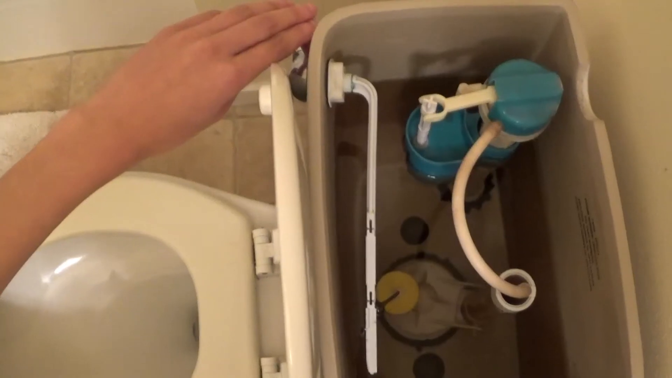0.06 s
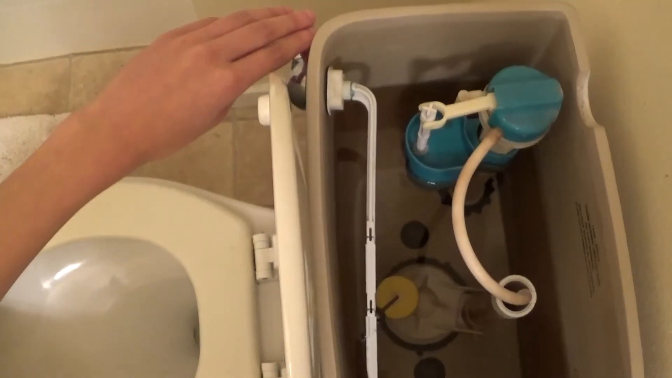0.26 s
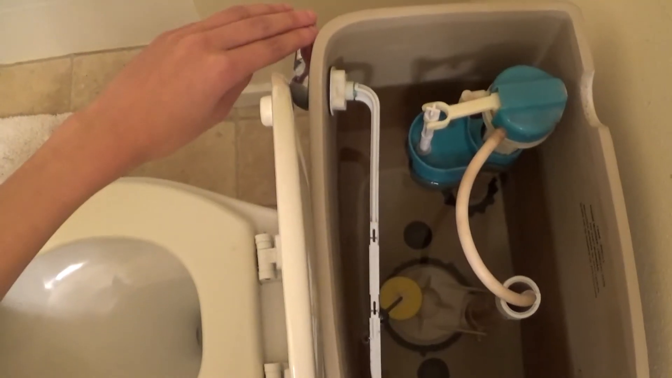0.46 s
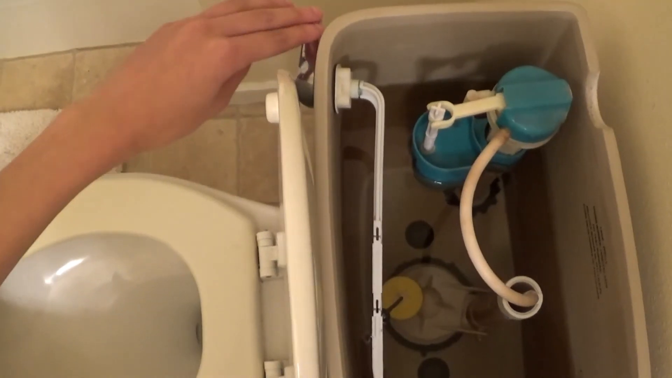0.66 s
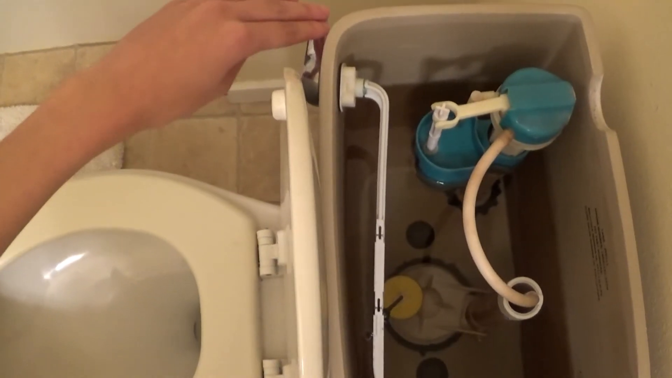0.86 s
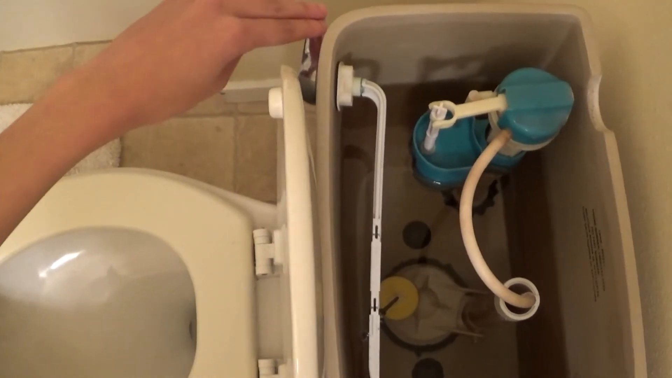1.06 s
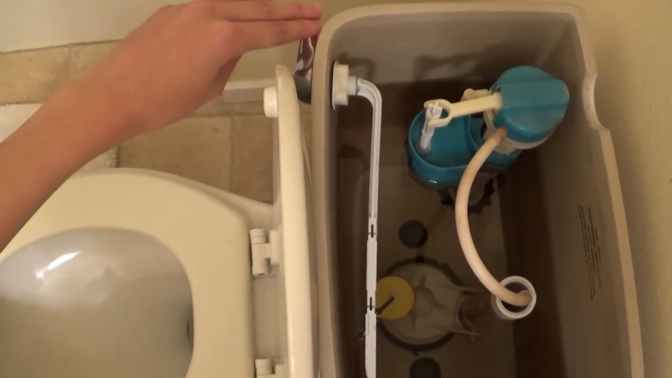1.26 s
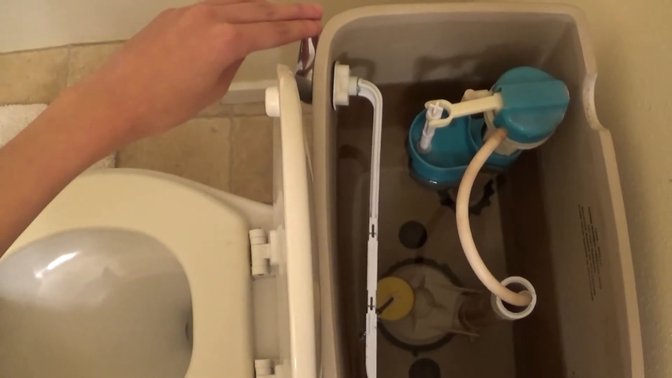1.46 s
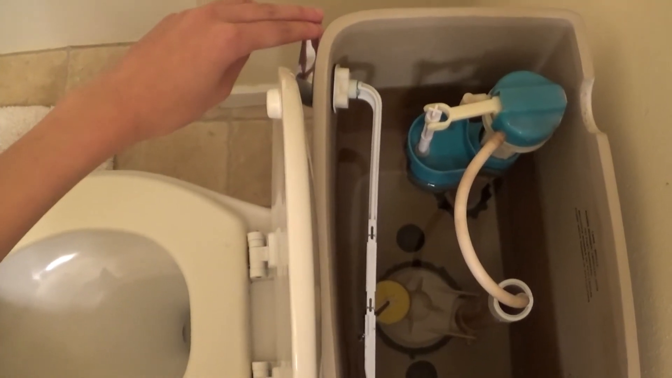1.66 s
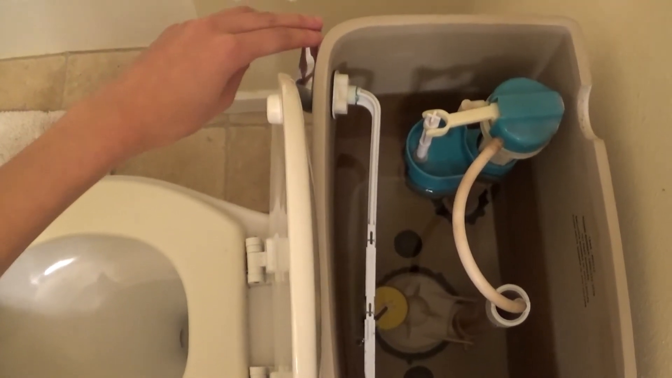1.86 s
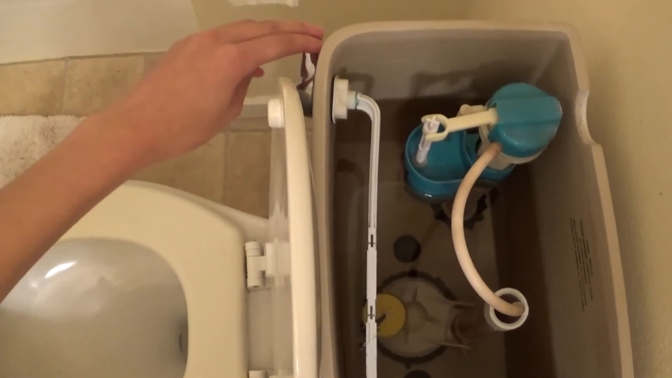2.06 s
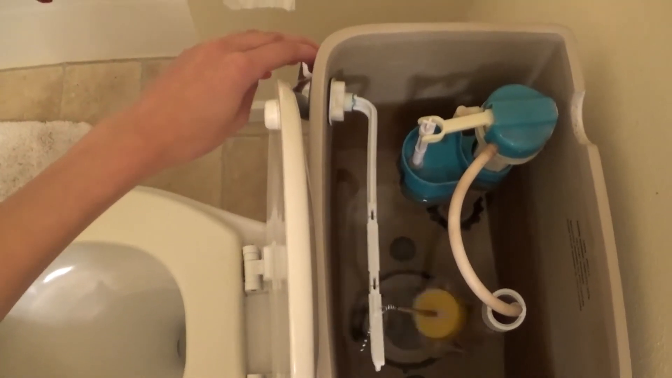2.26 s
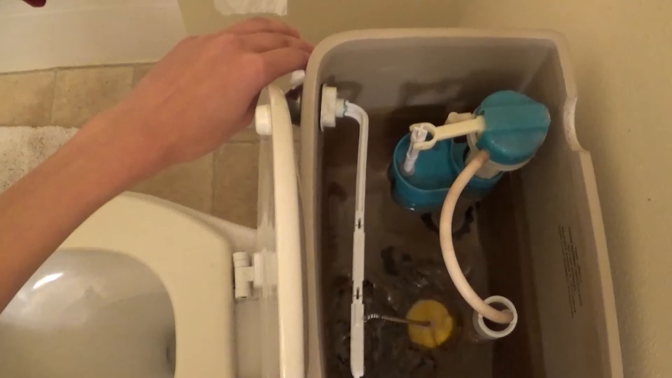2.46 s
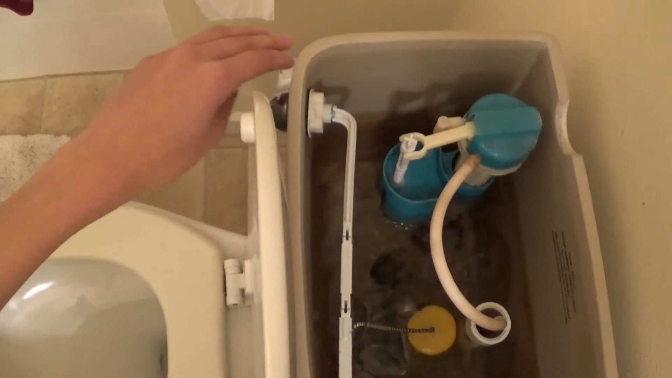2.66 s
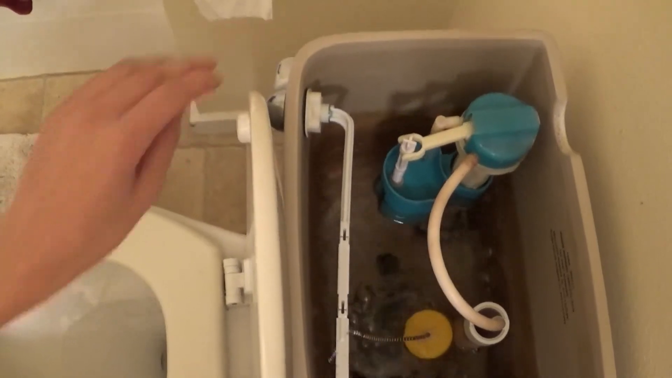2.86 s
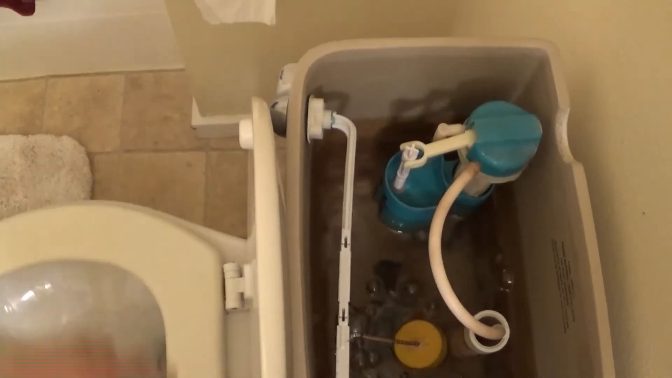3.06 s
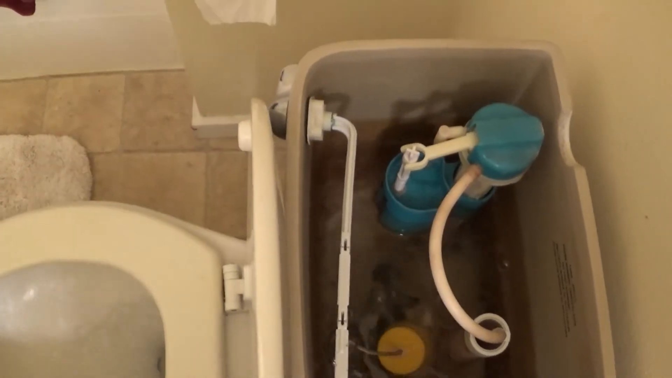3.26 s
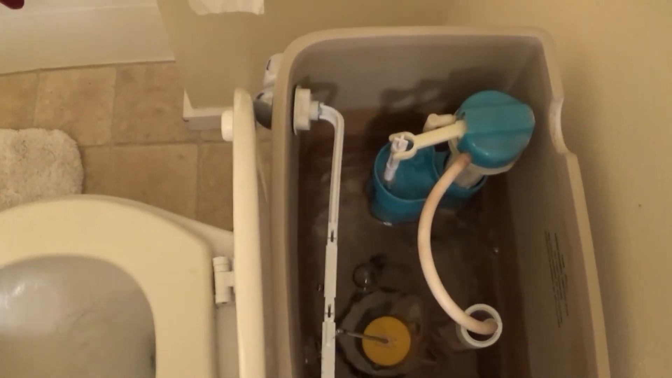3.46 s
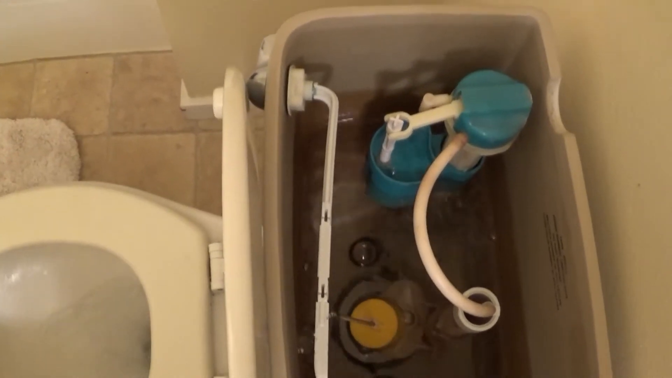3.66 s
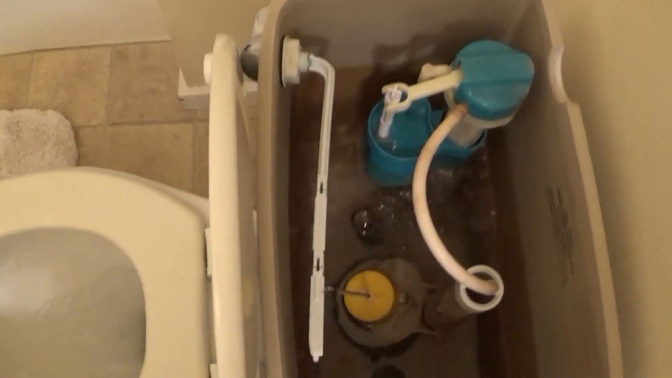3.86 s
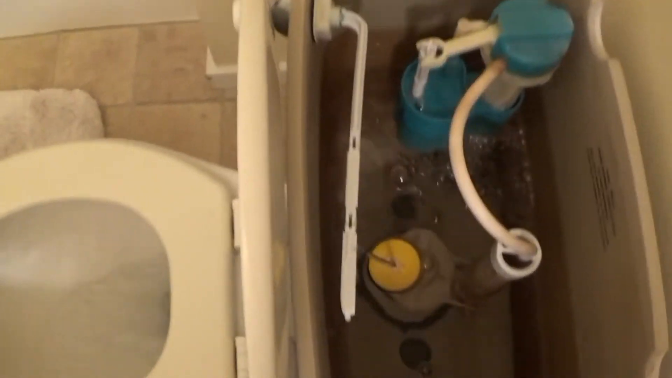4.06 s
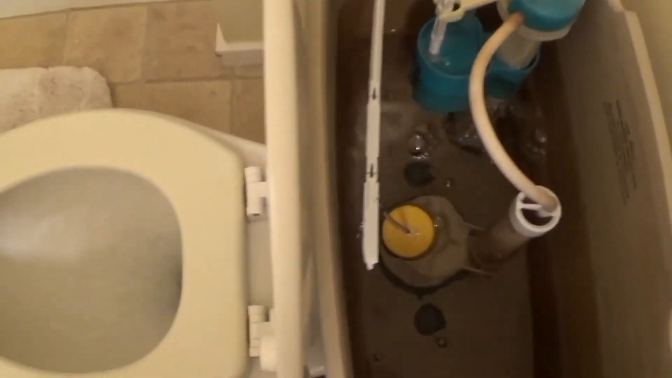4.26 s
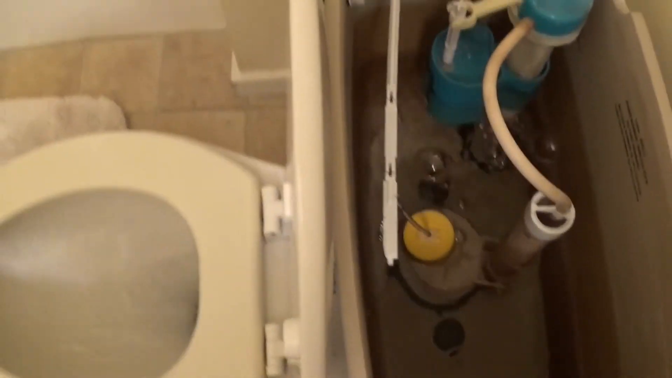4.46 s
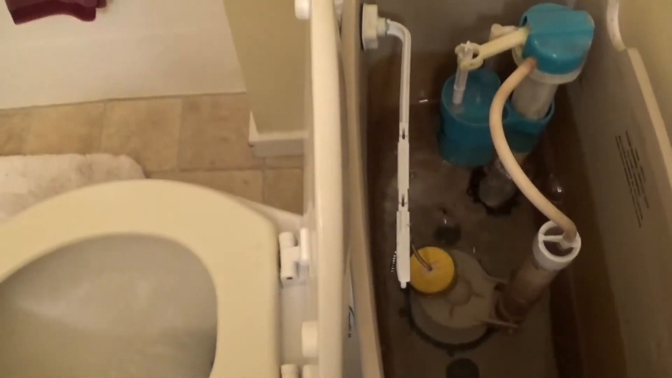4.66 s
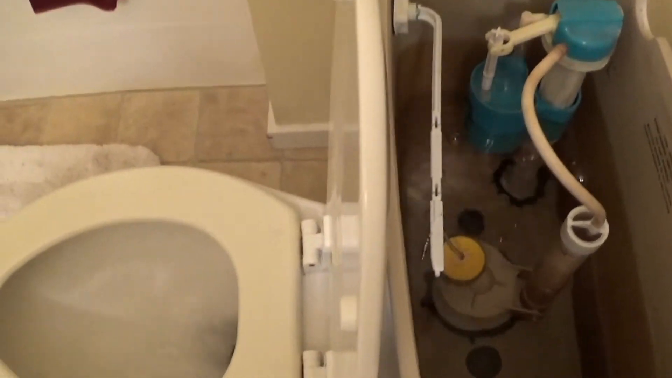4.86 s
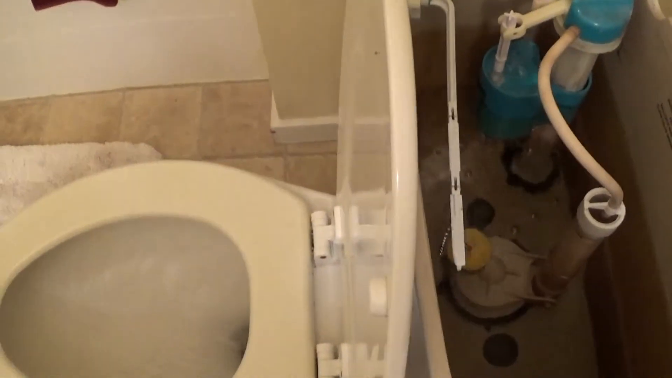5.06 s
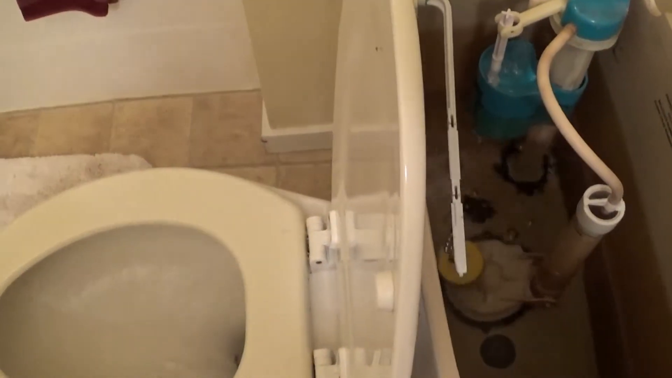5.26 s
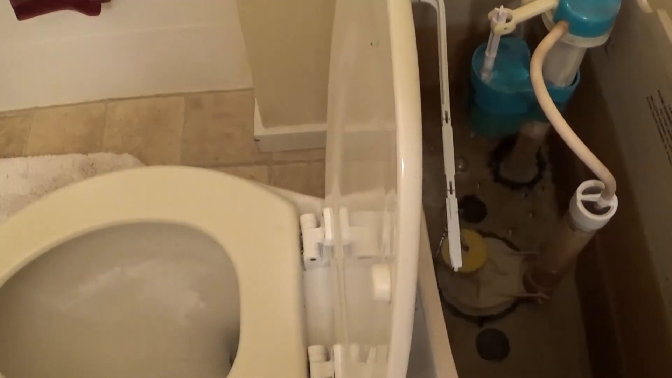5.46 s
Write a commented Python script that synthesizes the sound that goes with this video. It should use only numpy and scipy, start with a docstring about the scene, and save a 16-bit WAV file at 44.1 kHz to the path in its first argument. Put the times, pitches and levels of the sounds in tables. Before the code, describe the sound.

A metallic lever clatter breaks a hushed bathroom, then a toilet flush rushes with squealing, hissing valve, bubbling tank water and a late hollow gulp.

```python
"""A faint flow hums in the pipe of a small bathroom, heard from just above an open toilet tank. The handle
clacks in short, rough rings, the flapper lifts, and the fill valve squeals and hisses. Swarms of decaying
bubbles gurgle, splash and spit in the ringing porcelain tank, with plops on top. Noise through hollow,
wandering resonances becomes the drumming refill stream; near the end the bowl's siphon joins it with dull
thumps and a hollow gulping."""
import sys
import numpy as np
from scipy import signal
from scipy.fft import rfft, irfft, next_fast_len
from scipy.io import wavfile
from scipy.ndimage import uniform_filter1d, map_coordinates

SR = 44100
rng = np.random.default_rng(int(sys.argv[2]) if len(sys.argv) > 2 else 0)


def store_wav(level_fs):
    """Save 16-bit WAV to argv[1]."""
    pcm = np.round(np.clip(np.atleast_2d(level_fs), -1, 1) * 32767)
    wavfile.write(sys.argv[1], SR, pcm.T.astype(np.int16))


N = 243431
T = np.arange(N) / SR  # time in seconds

# resonances of the pipe's air column: pitch_hz, width_hz, level_db
PIPE_MODES = [(349.9, 6.3, -3.5), (395.8, 7.5, -11.5), (468.4, 11, -15.5), (711, 25, -12), (1217, 23, -8.5)]
# level of the faint flow, its last value held to the end: time_s, level_db
TRICKLE_LEVEL = [(0.3, -43), (0.42, -45), (1.8, -42.5), (2.0, -44.5)]
# tone of the still room: freq_hz, level_db
ROOM_TONE = [(60, -33), (110, -8.5), (300, -1), (950, -10.5), (3500, -18), (16000, -25)]
# decay of the porcelain and walls: freq_hz, t60_s
WALL_DECAY = [(200, 0.54), (1500, 0.21), (12000, 0.051)]
# tone of the stereo side signal, narrow in the bass and top treble: freq_hz, side_db
SIDE_TONE = [(200, -40), (600, -13.5), (2500, -4.5), (9000, -6), (13000, -29)]

# handle and lift arm contacts, relative levels: start_s, dull_knock_db, clink_db, bright_tick_db
HANDLE_CONTACTS = [(2.099, -34.5, -25.5, -24), (2.115, -45, -20, -27), (2.129, -38, -20, -32),
                   (2.161, -17, -47, -55), (2.171, -14, -26, -11.5), (2.194, -36, -19.5, -16),
                   (2.223, -22, -24, -6.5), (2.233, -25, -7, -26)]
# modes the contacts ring: pitch_hz, level_db, t60_s
LEVER_MODES = [(1120, -1.5, 0.12), (1197, 1, 0.12), (1610, -4.5, 0.053), (1970, -16, 0.19),
               (2610, -17, 0.064), (3260, -2, 0.046), (3790, -1, 0.039), (4480, -4, 0.076),
               (5210, -3.5, 0.061), (6020, -10, 0.093), (7300, -8.5, 0.03), (9030, -3, 0.081)]
CONTACT_S, FIRM_DB = 0.001, -12.5  # rise time of a firm contact; lighter ones slide in more slowly
# friction at each contact: relative level, decay time, sharpness of its resonances
SCRAPE_DB, SCRAPE_S, SCRAPE_Q = 6, 0.019, 11.6

# strength of the running water, used relative to its mean: time_s, level_db
FLOW_LEVEL = [(2.28, -28.5), (2.34, -32), (2.54, -27.5), (2.66, -19.5), (3.08, -27.5), (3.36, -22.5),
              (4.23, -28.5), (4.45, -25), (4.95, -25.5), (5.24, -20.5), (5.5, -22.5)]
FLAPPER_S, OPEN_S = 2.16, 0.059  # when the flapper starts to lift, and how long it takes
GURGLE_DB, SPLASH_DB, SPRAY_DB = -31.5, -23, -25.5  # base levels at average flow
BUBBLES_FOLLOW = 0.46  # dB per dB of flow; the spray follows it fully
DRAIN_FROM_S, DRAIN_S = 2.608, 0.31  # the water level drops and lays the inlet stream bare
COARSE_COVERED_DB, FINE_COVERED_DB = -4, -10  # change in splashing while the tank is still full
CHURN_DB, CHURN_PER_S = 0.8, 14  # each size of bubble comes and goes by chance: depth, knots a second
# the outlet gulps air and the whole tank surges: middle_s, length_s, rise_db
TANK_GLUGS = [(2.318, 0.23, 11), (2.467, 0.36, 4), (3.143, 0.47, 8), (3.273, 0.26, 5.5), (3.853, 0.16, 8),
              (4.013, 0.24, 6.5), (4.428, 0.047, 6), (4.726, 0.16, 7)]
GLUG_SHARE = 0.46  # share of that rise in the smaller bubbles
# the stream slaps the surface and small bubbles swell: middle_s, length_s, rise_db, bubble_pitch_hz
STREAM_SLAPS = [(2.502, 0.2, 6, 7500), (2.623, 0.078, 14, 4360), (2.847, 0.09, 7.5, 3230),
                (3.028, 0.2, 5.5, 2900), (3.275, 0.15, 4.5, 3000), (3.767, 0.16, 9, 3000),
                (4.029, 0.12, 5.5, 6460), (4.375, 0.22, 4.5, 2640), (4.702, 0.091, 7, 4330),
                (5.215, 0.084, 2.5, 8550), (5.333, 0.04, 8, 4060)]
SLAP_OCTAVES = 0.89  # spread of bubble pitch around each slap
# tone of the big bubbles: freq_hz, level_db
GURGLE_TONE = [(30, -49), (130, -12), (290, -3), (480, -0.5), (650, 1.5), (850, -2), (1300, 11)]
# tone of the smaller bubbles: freq_hz, level_db
SPLASH_TONE = [(450, -36), (800, -5.5), (1750, -0.5), (3100, -3), (5200, -11.5), (9000, -16)]
# tone of the fine spray: freq_hz, level_db
SPRAY_TONE = [(2000, -35), (3600, -7), (5800, -6), (9000, -0.5), (10200, -2.5), (11800, -11.5),
              (16000, -28)]
# resonances of the air in the tank: pitch_hz, width_hz, level_db
TANK_MODES = [(326, 63, 4), (665, 170, -6), (1048, 53, 3), (1388, 210, -0.5), (1730, 23, 1.5)]

# squeals as the float drops: start_s, length_s, level_db, starting_pitch_hz
VALVE_SQUEALS = [(2.225, 0.11, -22, 3350), (2.505, 0.12, -25.5, 3790)]
SQUEAL_SAG_HZ_PER_S, SQUEAL_ROUGH_HZ = 3000, 87.8
# resonances of the fill valve's whistling hiss: pitch_hz, width_hz, level_db
VALVE_MODES = [(3210, 49, 4), (3810, 860, 0.5), (11600, 4500, -7.5)]

# large bubbles: start_s, level_db, pitch_hz, t60_s, pitch_climb (share over that time; below 0 it falls)
LARGE_BUBBLES = [(2.29, -21, 383.6, 0.43, 0.5), (2.32, -19, 816, 0.23, -0.091),
                 (2.355, -15, 372, 0.15, -0.46), (2.426, -5, 4010, 0.017, -0.14),
                 (2.43, -17.5, 473, 0.19, 0.27), (2.462, 0.5, 2145, 0.016, -0.042),
                 (2.471, -15.5, 964, 0.11, 0.4), (2.497, -15.5, 1110, 0.18, 0.38),
                 (2.502, -11.5, 530, 0.097, 0.59), (2.724, -20, 1160, 0.42, 0.0027),
                 (2.922, -16, 543, 0.17, 0.094), (3.235, -16, 640, 0.5, 0.18), (5.427, -9, 920, 0.04, 0.05)]
WAVER, WAVER_PER_S = 0.014, 90  # typical share by which a bubble's pitch wavers, knots a second
SHED_COUNT, SHED_DB = 3, -10  # each sheds short-lived bubbles up to an octave higher, relative level
# drops bursting close by: start_s, peak_db (before placing), pitch_hz
BURSTING_DROPS = [(2.295, -8, 9800), (2.613, -8, 4260), (2.625, -3.5, 4440), (2.705, -12, 7800),
                  (2.798, -11, 8590), (2.89, -4.5, 7800), (2.921, -8.5, 9500), (3.038, -5, 9600),
                  (3.42, -5.5, 8500), (3.564, -10.5, 7500), (3.668, -8.5, 9300), (3.826, -9, 8650),
                  (3.921, -6.5, 9000), (4.257, -10, 6560), (4.46, -6, 9200), (4.889, -6, 8800),
                  (4.988, -6, 8600), (5.036, -9, 10500), (5.062, -7, 3000)]
DROP_S, DROP_Q = 0.0036, 8.9  # decay time of the burst and sharpness of its ring

# hollow bands of the stream in the emptied tank: pitch_hz, width_hz, level_db
REFILL_MODES = [(341, 19, 3.5), (1068, 50, -3), (1620, 150, 2), (1930, 200, -2.5)]
REFILL_DB, REFILL_FROM_S, REFILL_RISE_S = -26.5, 3.94, 0.67  # level, when it sets in, how long it grows
WANDER_PER_S = 12  # how often the water's resonances change course

# gulping in the bowl, silent before the first point: time_s, level_db
SIPHON_LEVEL = [(5.17, -56), (5.2, -23), (5.31, -30.5), (5.345, -15), (5.44, -14.5), (5.52, -20)]
# resonances of the emptying bowl: pitch_hz, width_hz, level_db
BOWL_MODES = [(295, 17, -4), (440, 26, -3.5), (598, 47, -6), (924, 61, 2.5), (1047, 81, -4),
              (1600, 120, -9), (2190, 600, -13.5)]
# air swallowed by the trap: start_s, level_db
TRAP_THUMPS = [(5.191, -14), (5.228, -17.5)]
# tone of each thump: freq_hz, level_db
THUMP_TONE = [(25, -36), (70, -13), (300, 3.5), (430, 13), (800, -31)]

TOP_HZ = 15900  # upper band limit


def amp(db):
    """Decibels to gain."""
    return 10 ** (np.asarray(db) / 20)


def unit(x):
    """Scale to rms 1."""
    return x / np.sqrt(np.mean(x ** 2) + 1e-20)


def along(points, hz):
    """Read a curve of (freq_hz, value) points on a log frequency axis."""
    f, v = np.transpose(points)
    return np.interp(np.log(hz + 1), np.log(f + 1), v)


def level_curve(points):
    """Read a curve of (time_s, level_db) points over the whole scene."""
    return np.interp(T, *np.transpose(points))


def noise():
    """White noise for the whole scene."""
    return rng.standard_normal(N)


def wobble(rate):
    """A smooth random curve, rate knots a second."""
    return map_coordinates(rng.standard_normal(int(N * rate / SR) + 4), [T * rate])


def filtered(x, response):
    """Multiply the spectrum of x by a response of frequency."""
    size = next_fast_len(N + SR // 2)
    return irfft(rfft(x, size) * response(np.fft.rfftfreq(size, 1 / SR)), size)[..., :N]


def coloured(x, spectrum):
    """Shape x with a tone curve and bring it to rms 1."""
    return unit(filtered(x, lambda hz: amp(along(spectrum, hz))))


def resonate(x, modes):
    """Pass x through a bank of parallel resonances."""
    return filtered(x, lambda f: sum(amp(db) * 1j * f * w / (c * c - f * f + 1j * f * w)
                                     for c, w, db in modes))


def peaked(x, hz, sharpness):
    """Pass a short sound through one narrow resonance."""
    return signal.lfilter(*signal.iirpeak(hz, sharpness, fs=SR), x)


def add(track, s, sound):
    """Mix a sound in at time s."""
    part = track[round(s * SR):][:len(sound)]
    part += sound[:len(part)]


def surge(s, length):
    """A smooth rise and fall (0-1) centred on time s."""
    return np.cos(np.pi * np.clip((T - s) / length, -.5, .5)) ** 2


def bubble(age, cycles, rise):
    """A bubble's ring over its life (age 0-1): it dies by 60 dB while its pitch glides by the share rise."""
    return np.sin(2 * np.pi * cycles * age * (1 + rise * age / 2)) * np.exp(-np.log(1000) * age)


def froth(rate, low_hz, high_hz, cycles, spread_db, rise, wash_db):
    """A swarm of bubbles of random pitch and strength on a noise wash of countless smaller ones."""
    when, pitch, size, ring = rng.random((int(rate * N / SR), 4)).T
    hz = low_hz * (high_hz / low_hz) ** pitch
    turns = cycles * (.5 + ring)
    life = (turns / hz * SR).astype(int) + 1  # samples
    strength = hz * amp(-spread_db * np.log(np.maximum(size, .01)))
    # lay all lives end to end, then sum each sample at its place in time
    which = np.repeat(np.arange(len(hz)), life)
    step = np.arange(len(which)) - (np.cumsum(life) - life)[which]
    rings = strength[which] * bubble(step / life[which], turns[which], rise)
    swarm = np.bincount((when * N).astype(int)[which] + step, rings, N)[:N]
    # match the swarm's density within its band to the white wash
    return unit(swarm) * np.sqrt(SR / 2 / (high_hz - low_hz)) + amp(wash_db) * noise()


def wandering(x, share):
    """Moving water shifts every resonance in x slowly up and down by about a share of its pitch."""
    return map_coordinates(x, [np.arange(N) + share * np.cumsum(wobble(WANDER_PER_S))], mode="reflect")


def echo(x):
    """Dense reflections from porcelain, walls and moving water: the pattern drifts, the treble dies first."""
    hz, t, z = signal.stft(rng.standard_normal((3, SR // 3)), SR, nperseg=256)
    decay = np.exp(-np.log(1000) * t / along(WALL_DECAY, hz)[:, None])
    tails = signal.istft(z * decay, SR, nperseg=256)[1]
    shares = np.array([wobble(3) for tail in tails])
    shares /= np.linalg.norm(shares, axis=0)
    wet = signal.fftconvolve(shares * x, tails / np.linalg.norm(tails[0]), axes=1).sum(0)
    return np.pad(wet, (SR // 500, 0))[:N]  # 2 ms later than the direct sound


def placed(x, wet_db, side_db, left_db=0):
    """Direct sound plus an echo in the middle, a second echo toned as the stereo side signal, and a tilt."""
    mid = (x + amp(wet_db) * echo(x)) / np.hypot(1, amp(wet_db))
    side = filtered(echo(x), lambda hz: amp(along(SIDE_TONE, hz) + side_db))
    return np.array([(mid + side) * amp(left_db / 2), (mid - side) * amp(-left_db / 2)])


def pipe_hum():
    """A faint flow keeps the pipe's air column sounding over the still room."""
    hum = resonate(noise(), PIPE_MODES)
    hum = coloured(hum, [(80, -45), (280, 9.5), (1300, -9.5), (6000, -62)])
    swell = np.sqrt(np.abs(uniform_filter1d(hum ** 2, size=SR // 12)))
    steady_hum = hum / swell
    air = amp(-51.0) * coloured(noise(), ROOM_TONE)
    gain = amp(level_curve(TRICKLE_LEVEL) + 1.2 * wobble(10.27))
    return placed(gain * steady_hum + air, wet_db=-10.5, side_db=-1.0)


def handle():
    """Each contact rings the lever's low, middle and high modes at its own strengths and scrapes briefly."""
    track, t = np.zeros(N), T[:SR // 3]
    hz, mode_db, t60 = np.transpose(LEVER_MODES)[:, :, None]
    for s, knock_db, clink_db, tick_db in HANDLE_CONTACTS:
        blow = [(1700, knock_db), (3000, clink_db), (5000, clink_db), (7000, tick_db)]
        level = mode_db + along(blow, hz) + 2 * rng.standard_normal(hz.shape)
        pitch = hz * (1 + 0.011 * rng.standard_normal(hz.shape))  # the loose parts seat differently each time
        tone = np.sin(2 * np.pi * (pitch * t + rng.random(hz.shape)))
        ring = amp(level) * np.exp(-np.log(1000) * t / t60) * tone
        friction = amp(SCRAPE_DB) * np.exp(-t / SCRAPE_S) * rng.standard_normal(len(t))
        scrape = sum(amp(db) * peaked(friction, f, SCRAPE_Q) for f, db in zip(hz.flat, level.flat))
        rise_s = CONTACT_S * amp(FIRM_DB - max(knock_db, clink_db, tick_db))
        add(track, s, amp(-2.0) * (ring.sum(0) + scrape) * (1 - np.exp(-t / rise_s)))
    return placed(track, wet_db=-3.0, side_db=-7.5, left_db=-2.0)


def slap_rise(size_hz):
    """Rise in dB of bubbles pitched at size_hz: a slap lifts most those near its own bubble pitch."""
    rise = np.zeros(N)
    for s, length, db, hz in STREAM_SLAPS:
        octaves = np.log2(size_hz / hz)
        rise += db * surge(s, length) * np.exp(-(octaves / SLAP_OCTAVES) ** 2)
    return rise


def water_gains():
    """Gains of gurgle, coarse splash, fine splash and spray: flow, glugs, slaps and chance move them."""
    flow = level_curve(FLOW_LEVEL)
    flow = flow - flow[T > FLAPPER_S].mean()
    covered = 1 - np.clip((T - DRAIN_FROM_S) / DRAIN_S, 0, 1)
    glug = sum(db * surge(s, length) for s, length, db in TANK_GLUGS)
    gurgle = GURGLE_DB + BUBBLES_FOLLOW * flow + glug
    splash = SPLASH_DB + BUBBLES_FOLLOW * flow + GLUG_SHARE * glug
    coarse = splash + slap_rise(size_hz=1080) + COARSE_COVERED_DB * covered
    fine = splash + slap_rise(size_hz=2680) + FINE_COVERED_DB * covered
    spray = SPRAY_DB + flow + GLUG_SHARE * glug + slap_rise(size_hz=7800)
    opening = np.clip((T - FLAPPER_S) / OPEN_S, 0, 1) ** 2
    return [opening * amp(db + CHURN_DB * wobble(CHURN_PER_S)) for db in (gurgle, coarse, fine, spray)]


def rush():
    """Big bubbles gurgle and smaller ones splash in the hollow tank; the inlet jet spits fine spray."""
    gurgle_gain, coarse_gain, fine_gain, spray_gain = water_gains()
    gurgle = froth(rate=400, low_hz=182.3, high_hz=896, cycles=27.0, spread_db=1.5, rise=0.31, wash_db=-22)
    splash = froth(rate=1900, low_hz=822, high_hz=4955, cycles=19.8, spread_db=3.0, rise=0.17, wash_db=-10)
    spray = froth(rate=2400, low_hz=3390, high_hz=14650, cycles=48, spread_db=4.5, rise=0.06, wash_db=5.0)
    gurgle = coloured(gurgle + resonate(gurgle, TANK_MODES), GURGLE_TONE)
    splash = coloured(splash + resonate(splash, TANK_MODES), SPLASH_TONE)
    spray = coloured(spray, SPRAY_TONE) * amp(1.48 * wobble(95))  # the jet spits in clumps
    gurgle = unit(placed(gurgle, wet_db=-6.0, side_db=-2.0))
    splash = unit(placed(splash, wet_db=-1.0, side_db=-4.5, left_db=-0.6))
    spray = unit(placed(spray, wet_db=-8.0, side_db=-3.0, left_db=-0.5))
    fine = filtered(splash, lambda hz: hz ** 4 / (hz ** 4 + 1650 ** 4))  # highpass
    coarse = splash - fine
    return gurgle_gain * gurgle + coarse_gain * coarse + fine_gain * fine + spray_gain * spray


def squeal():
    """The valve's seal sings roughly and sags in pitch."""
    track = np.zeros(N)
    for s, length, db, hz in VALVE_SQUEALS:
        pitch = hz - SQUEAL_SAG_HZ_PER_S * np.clip(T - s, 0, length) + SQUEAL_ROUGH_HZ * wobble(500)
        envelope = np.sqrt(surge(s + length / 2, length))
        track += amp(db) * envelope * np.sin(2 * np.pi * np.cumsum(pitch) / SR)
    return placed(track, wet_db=-9, side_db=-9)


def valve():
    """The float drops and the fill valve opens with a whistling hiss that dies away as the stream settles."""
    age = np.maximum(T - 2.23, 0)  # seconds since the valve opened
    hiss = unit(resonate(noise(), VALVE_MODES))
    flutter_db = 2.5 * wobble(40)
    gain = amp(-31.5 + flutter_db) * (1 - np.exp(-age / 0.0037)) * np.exp(-(age / 1.77) ** 2)
    return placed(gain * hiss, wet_db=-8.0, side_db=-16)


def plops():
    """Large bubbles swell, waver, glide in pitch and shed smaller ones; drops burst with a crisp tick."""
    track, t = np.zeros(N), T[:SR // 50]
    for s, db, hz, t60, rise in LARGE_BUBBLES:
        age = np.arange(int(t60 * SR)) / (t60 * SR)
        swell = 1 - np.exp(-age * t60 * hz)
        waver = WAVER * np.cumsum(wobble(WAVER_PER_S)[:len(age)]) / len(age)
        add(track, s, amp(db) * bubble(age + waver, hz * t60, rise) * swell)
        for delay, octave in rng.random((SHED_COUNT, 2)):
            shed = bubble(age, hz * t60 * 2 ** octave / 2, rise) * swell
            add(track, s + delay * t60 / 2, amp(db + SHED_DB) * shed[::2])  # half as long a life
    for s, db, hz in BURSTING_DROPS:
        tick = peaked(np.exp(-t / DROP_S) * rng.standard_normal(len(t)), hz, DROP_Q)
        add(track, s, amp(db) * tick / np.abs(tick).max())
    return placed(track, wet_db=-8.5, side_db=-8.0, left_db=-1.5)


def refill():
    """Once the tank has drained, the inlet stream drums on in hollow, wandering bands."""
    stream = unit(wandering(resonate(noise(), REFILL_MODES), share=0.015))
    gain = amp(REFILL_DB + 2.2 * wobble(18)) * np.clip((T - REFILL_FROM_S) / REFILL_RISE_S, 0, 1)
    return placed(gain * stream, wet_db=-10.5, side_db=-7)


def siphon():
    """The trap swallows air with dull thumps and gulps through the emptying bowl's resonances."""
    gulps = froth(rate=1000, low_hz=185, high_hz=2360, cycles=14.0, spread_db=0, rise=0.16, wash_db=7.0)
    gulps = coloured(wandering(resonate(gulps, BOWL_MODES), share=0.022), [(60, -50), (220, 3)])
    started = T > SIPHON_LEVEL[0][0]
    track = gulps * amp(level_curve(SIPHON_LEVEL) + 1.3 * wobble(35)) * started
    t = T[:SR // 4]
    for s, db in TRAP_THUMPS:
        thump = coloured(noise(), THUMP_TONE)[:len(t)]
        add(track, s, amp(db) * thump * np.exp(-t / 0.02) * (1 - np.exp(-t / 0.0028)))
    return placed(track, wet_db=-4.5, side_db=1)


def scene():
    """Hum, handle, rushing water, valve squeal and hiss, plops, refill and siphon."""
    return pipe_hum() + handle() + rush() + squeal() + valve() + plops() + refill() + siphon()


def record(dry):
    """Flatten peaks at full scale, then remove everything above the band limit."""
    return filtered(np.clip(dry, -1, 1), lambda hz: hz < TOP_HZ)


dry = scene()
out = record(dry)
store_wav(out)
```